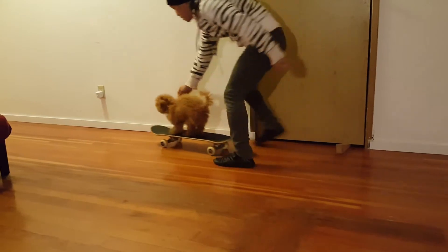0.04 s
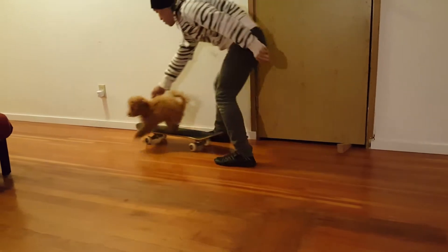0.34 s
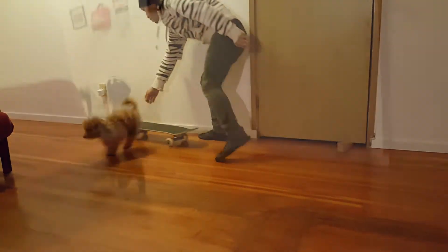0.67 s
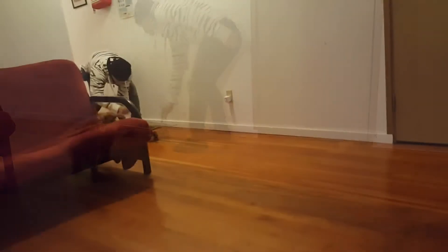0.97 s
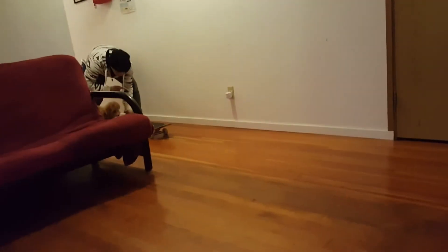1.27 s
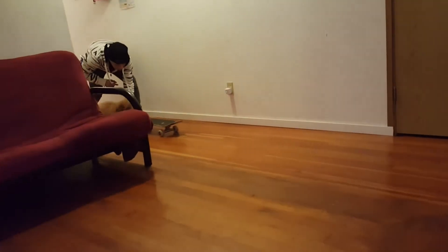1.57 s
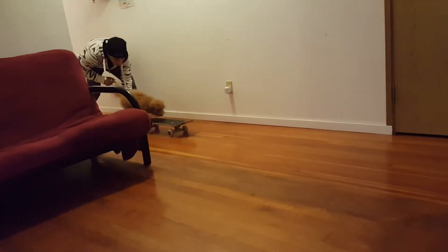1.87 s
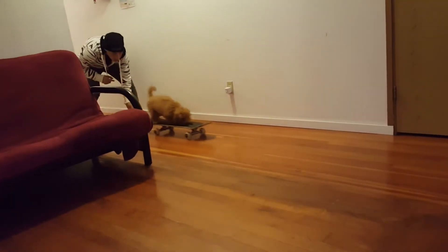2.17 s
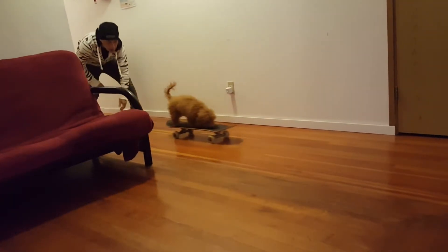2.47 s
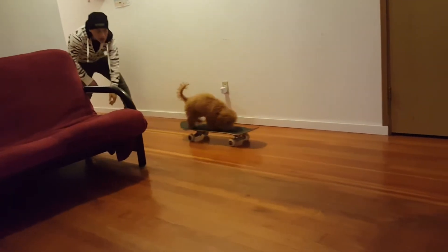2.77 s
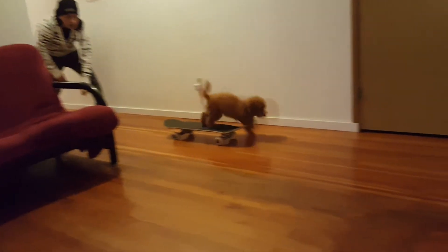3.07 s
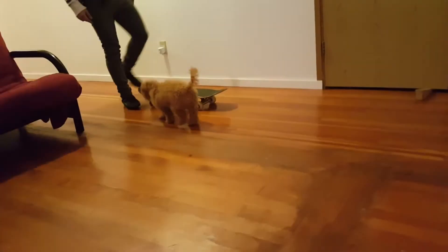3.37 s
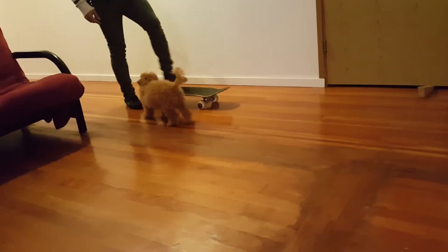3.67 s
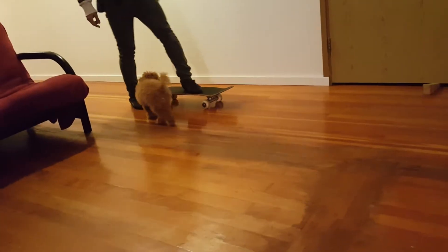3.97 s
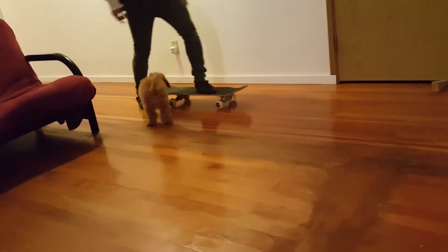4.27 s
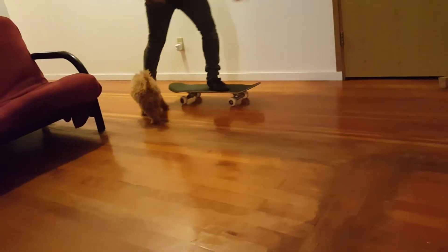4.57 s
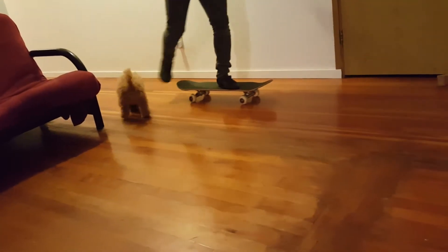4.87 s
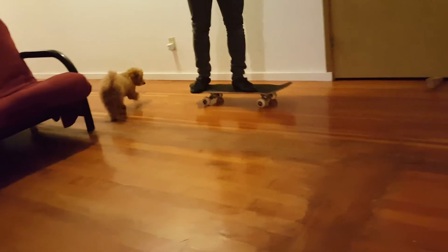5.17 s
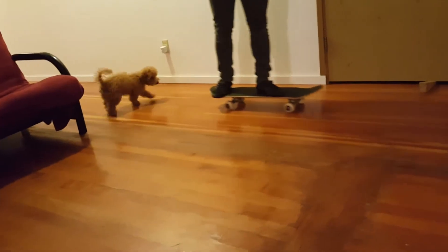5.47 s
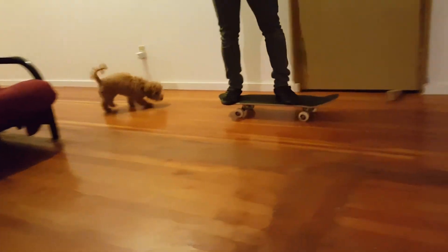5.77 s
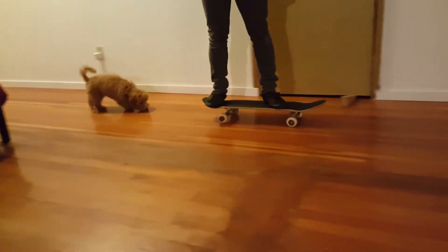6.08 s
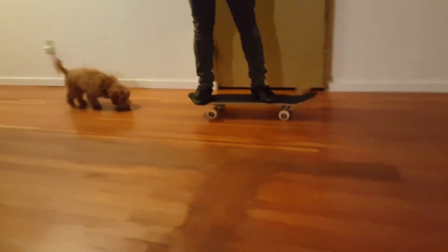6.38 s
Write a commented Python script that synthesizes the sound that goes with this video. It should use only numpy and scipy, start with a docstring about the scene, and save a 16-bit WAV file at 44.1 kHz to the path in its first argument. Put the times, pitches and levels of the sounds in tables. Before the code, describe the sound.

In a bare living room, a skateboard is pushed across a hardwood floor, wheels rumbling while the deck knocks and the metal trucks rattle. It rolls again with small clacks and several louder clunks, stops, is stamped on, then rolls off with a heavier rumble. Shoes and paws scuff the grip tape, with a few light ticks. In the second half a finger softly bumps the microphone on the duller right side.

```python
"""A bare living room with a hardwood floor: a skateboard is pushed about, with a puppy on it, then a rider.
The wheels rumble over the boards; the deck knocks, its trucks rattle and the floor booms.
Shoes and paws scuff on the grip tape; light ticks come from claws, fittings and one click of a finger.
That finger lies over the right microphone port: it dulls that side and now and then bumps and rubs it."""
import sys
import numpy as np
from scipy import signal
from scipy.fft import rfft, irfft
from scipy.io import wavfile

SR = 44100
rng = np.random.default_rng(int(sys.argv[2]) if len(sys.argv) > 2 else 0)


def wrap_up_sound(samples):
    """Save the sound to the file named by the first command line argument, as 16-bit audio."""
    columns = np.atleast_2d(samples).T
    # keep every value between -1 and 1, then stretch to whole-number steps
    tamed = np.clip(columns, -1, 1)
    steps = np.round(tamed * 32767).astype(np.int16)
    wavfile.write(sys.argv[1], SR, steps)


N = 288414
RING_SIZE = 32000   # samples for one hit and its tail

# resonances of the floor, the wooden deck and the metal trucks: f/Hz, width/Hz, level/dB
FLOOR_MODES = [(79.24, 3.6, -4.5), (113.5, 8, 1.5), (137.4, 11, -4), (167.8, 17.7, -4), (208.6, 16.5, -5),
               (233.4, 9.9, -6), (305.4, 28, -12.5)]
DECK_MODES = [(326, 17.2, 1), (347.5, 23.6, 7), (420, 172, 1.5), (622, 160, 4.5), (782, 86, 6.5),
              (956, 160, 2), (1079, 73, 4.5), (1250, 97, 1.5), (1502, 169, 1.5), (1875, 238, -1),
              (2153, 60, -0.5), (2310, 170, -6), (3085, 460, -13.5), (3420, 15.5, -8)]
TRUCK_MODES = [(3430, 1700, 1.5), (5240, 175, 14), (5236, 190, 13.5), (7200, 810, -1.5), (7890, 500, -4.5),
               (10440, 1700, -8), (15000, 11000, -12)]
# weight on the board, from a puppy to a rider: t/s, load/0-1
BOARD_LOAD = [(0, 0.23), (.9, 0.51), (1.2, 0.13), (2.6, 0.35), (3.2, 0.067), (4.9, 0.99), (6.54, 0.86)]


def from_db(db):
    """Decibels to gain."""
    return 10 ** (np.asarray(db) / 20)


def rms_one(x):
    """Scale to an rms of 1."""
    return x / np.sqrt(np.mean(x ** 2) + 1e-20)


def burst(x, db):
    """Give a short sound the energy of 50 ms at this level."""
    return from_db(db) * rms_one(x) * np.sqrt(SR / 20 / x.shape[-1])


def in_time(points):
    """Draw an automation curve through the points, sample by sample."""
    times, values = np.transpose(points)
    return np.interp(np.arange(N) / SR, times, values)


def at_hz(points, hz):
    """Read a curve on a log-frequency axis."""
    known, values = np.transpose(points)
    return np.interp(np.log(hz + 1), np.log(known), values)


def swell(s, half_s):
    """A smooth rise and fall around time s, of height 1."""
    return np.exp(-((np.arange(N) / SR - s) / half_s) ** 2)


def add(out, s, x):
    """Mix x into out from time s on."""
    start = max(round(s * SR), 0)
    out[..., start:start + x.shape[-1]] += x[..., :N - start]


def cut(x, hz, kind, order=2):
    """Butterworth low-pass or high-pass."""
    return signal.sosfilt(signal.butter(order, hz, kind, fs=SR, output="sos"), x)


def body(x, modes, tilt_db=0):
    """Parallel resonances of alternating sign, tilted per octave about 1 kHz."""
    out = 0
    for k, (hz, width, db) in enumerate(modes):
        r = np.exp(-np.pi * width / SR)
        gain = (-1) ** k * from_db(db + tilt_db * np.log2(hz / 1000)) * (1 - r * r) / 2
        poles = [1, -2 * r * np.cos(2 * np.pi * hz / SR), r * r]
        out = out + gain * signal.lfilter([1, 0, -1], poles, x)
    return out


def favour(modes, hz, db, octaves):
    """The spot struck brings out the modes near one pitch."""
    return [(f, width, level + db * np.exp(-(np.log2(f / hz) / octaves) ** 2))
            for f, width, level in modes]


def grains(size, per_s, spread_db):
    """Tiny contacts at random moments, of uneven strength."""
    hit = rng.random(size) < per_s / SR
    return (hit + 1e-9) * rng.standard_normal(size) * from_db(spread_db * rng.standard_normal(size))


def diffuse(size, spectrum=((1, 0),)):
    """Noise arriving from all sides: alike at both ports in the bass, unrelated in the treble."""
    # likeness of the room sound left and right: f/Hz, correlation/0-1
    likeness = [(60, 0.84), (130, 1), (250, 0.92), (500, 0.66), (1000, 0.0021), (2000, 0), (4000, 0)]
    hz = np.fft.rfftfreq(size, 1 / SR)
    alike = at_hz(likeness, hz)
    mid, side = rfft(rng.standard_normal((2, size)))
    pair = np.sqrt(1 + alike) * mid + np.sqrt(1 - alike) * side * [[1], [-1]]
    return rms_one(irfft(pair * from_db(at_hz(spectrum, hz)), size))


def room(contacts, t60, direct_db, build_s=0.0012):
    """Each contact arrives directly, then feeds a diffuse tail that builds up and dies away."""
    decay, build = from_db(-120 / (t60 * SR)), np.exp(-1 / (build_s * SR))
    energy = signal.lfilter([(1 - decay) * (1 - build)], np.poly([decay, build]), contacts ** 2)
    direct = np.array([contacts, np.pad(contacts, (3, 0))[:-3]])   # left leads by 3 samples
    return from_db(direct_db) * direct + diffuse(len(contacts)) * np.sqrt(np.abs(energy))


def room_tone():
    """The quiet room and the microphone's hiss make a steady bed."""
    # colour of the bed: f/Hz, relative level/dB
    spectrum = [(20, -18.5), (50, 2.5), (130, -6.5), (300, -4), (700, -12.5), (2300, -14.5), (4000, -23),
                (9000, -33.5), (15500, -30)]
    return from_db(-62.5) * diffuse(N, spectrum)


def finger(loose_hz=163.5, tight_hz=232, tightens_s=5.25, lead_s=0.015):
    """Skin pushes and releases the air in the port: soft swings of a cycle or two, and a low rub."""
    # bumps on the port: t/s, peak level/dB
    bumps = [(3.712, -36.5), (3.756, -33.5), (3.804, -37), (3.881, -34.5), (3.899, -33.5), (3.954, -40),
             (4.081, -37.5), (4.591, -29.5), (4.629, -27.5), (4.6552, -27.5), (4.7684, -18), (4.935, -19.5),
             (5.018, -26), (5.052, -28), (5.147, -26), (5.352, -20.5), (5.597, -19.5), (5.765, -21),
             (5.807, -19.5), (6.307, -26.5), (6.338, -25)]
    # rubs across it: t/s, level/dB, half length/s
    rubs = [(3.395, -43, 0.023), (3.424, -41.5, 0.0072), (3.514, -49, 0.053)]
    out, t = np.zeros(N), np.arange(SR // 20) / SR
    for s, db in bumps:
        grip_hz = loose_hz if s < tightens_s else tight_hz
        hz = grip_hz * 2 ** (0.07 * (db + 28))   # a harder bump is quicker
        phase = 2 * np.pi * hz * (t - lead_s)
        swing = cut(np.sin(phase) / np.cosh(phase / 1.21), 33, "high")
        add(out, s - lead_s, from_db(db) * swing / np.abs(swing).max())
    slips = grains(N, per_s=1200, spread_db=1)
    rub = cut(body(slips, [(495, 180, 0)]), 1200, "low")
    strokes = sum(from_db(db) * swell(s, half_s) for s, db, half_s in rubs)
    return out + strokes * rms_one(rub)


def ticks():
    """Light ticks, each a damped ring: claws, fittings and one click of the finger on the microphone."""
    # light touches: t/s, level/dB, f/Hz
    touches = [(3.421, -61.5, 2450), (3.992, -65.5, 5260), (4.782, -69.5, 1190), (4.95, -61.5, 1110),
               (5.012, -64, 1600), (6.523, -65, 5250)]
    out = np.zeros((2, N))
    for s, db, hz in touches:
        touch = room(signal.unit_impulse(RING_SIZE), t60=0.98, direct_db=-2.5)
        add(out, s, burst(body(touch, [(hz, 0.28 * hz, 0)]), db))
    return out


def scuffs():
    """A sole or paw slides over grit: dense catches, a broad hiss with one rasping resonance."""
    # slides on grip tape and floor: t/s, length/s, level/dB, rasp f/Hz, relative rasp level/dB
    slides = [(0.85, 0.12, -54, 4400, -8.5), (1.369, 0.059, -57.5, 1460, 11),
              (2.037, 0.036, -62.5, 6500, 11), (2.27, 0.035, -62.5, 6000, 8), (2.5, 0.1, -59, 7000, 10),
              (2.69, 0.06, -58, 7000, 10), (3.702, 0.084, -66, 2130, 0), (4.692, 0.06, -68, 1530, 8),
              (5.847, 0.13, -45, 2440, -4.5), (5.9, 0.048, -44.5, 1900, 35), (6.163, 0.12, -46.5, 5200, 4),
              (6.196, 0.14, -49, 3100, -2.5)]
    # resonances of the grip tape: f/Hz, width/Hz, level/dB
    grip_tape = [(1620, 490, -0.5), (2750, 2300, -14.5), (5360, 5900, -15), (7080, 290, -7.5),
                 (12000, 2600, -64)]
    out, t = np.zeros((2, N)), np.arange(RING_SIZE) / SR
    for s, length_s, db, rasp_hz, rasp_db in slides:
        stroke = np.clip(t / 0.0019, 0, 1) * np.clip((length_s - t) / 0.12, 1e-9, 1)
        sand = grains(RING_SIZE, per_s=1500, spread_db=2)
        catches = room(sand * stroke, t60=0.62, direct_db=-1.5)
        add(out, s, burst(body(catches, grip_tape + [(rasp_hz, 0.19 * rasp_hz, rasp_db)]), db))
    return out


def boom(floor_hz):
    """A heavy blow sets the floorboards ringing."""
    blow = room(signal.unit_impulse(RING_SIZE), t60=0.37, direct_db=0.0, build_s=0.003)
    boards = body(blow, favour(FLOOR_MODES, floor_hz, db=12.0, octaves=0.25))
    return cut(cut(boards, 60, "high", order=4), 1300, "low")


def rattle(decay_s, rebound=0.091):
    """One blow, then fading rebounds; the longer they last, the more of the energy they hold."""
    t = np.arange(RING_SIZE) / SR
    rebounds = grains(RING_SIZE, per_s=700, spread_db=4.5) * (np.exp(-t / decay_s) + 1e-9)
    strength = rebound * np.sqrt(decay_s * SR)
    return signal.unit_impulse(RING_SIZE) + strength * rebounds / np.linalg.norm(rebounds)


def knock(deck_db, boom_db, tilt_db, rattle_s, floor_hz, deck_hz, hardness_hz):
    """A rattling blow shakes the deck and the metal trucks; the weight behind it booms in the floor."""
    contacts = rattle(rattle_s)
    deck_modes = favour(DECK_MODES, deck_hz, db=4.5, octaves=0.27)
    wood = body(room(contacts, t60=0.54, direct_db=-6.0), deck_modes, tilt_db)
    wood = cut(cut(wood, 4300, "low", order=4), 164, "high")
    metal = cut(body(room(contacts, t60=0.54, direct_db=-2.5), TRUCK_MODES), 4940, "high")
    metal = cut(burst(metal, deck_db - 14), hardness_hz, "low", order=3)
    lag = round(0.00607 * SR)   # the heavy floor answers a moment later
    floor = np.pad(boom(floor_hz), ((0, 0), (lag, 0)))[:, :RING_SIZE]
    return burst(wood, deck_db) + burst(floor, boom_db) + metal


def board_hits(empty_hz=261, loaded_hz=76.5):
    """The board hits the floor: heavy slams, light clacks and dull thuds of the floor alone."""
    # the board slams down or is stamped on: t/s, deck level/dB, boom level/dB,
    # deck tilt/dB per octave, rattle decay/s, floor f/Hz, deck f/Hz, contact hardness/Hz
    slams = [(0.1885, -32, -28.5, -4, 0.0034, 107, 1950, 11500),
             (0.194, -35, -34.5, 8.5, 0.0097, 230, 1100, 11900),
             (0.504, -31, -34.5, 2.5, 0.017, 115, 776, 14800),
             (0.595, -31, -28, 0.5, 0.014, 123.5, 844, 12900),
             (1.8196, -30.5, -33.5, 0.5, 0.011, 93.6, 1260, 9800),
             (2.8784, -30, -29, 1, 0.0057, 80, 2220, 14500),
             (2.899, -32, -34.5, 1, 0.0036, 142, 1050, 5060), (3.082, -30, -37, 2.5, 0.014, 85, 2220, 8000),
             (3.202, -31.5, -33.5, -0.5, 0.024, 94, 2340, 10500),
             (4.104, -30.5, -34.5, 0, 0.0018, 168, 1900, 14000),
             (4.11, -27.5, -35, 2, 0.041, 90, 1254, 7000),
             (4.131, -32.5, -30.5, -0.5, 0.011, 133, 700, 10300),
             (5.169, -32.5, -40, 3, 0.0088, 119, 1220, 4970)]
    # a wheel drops into a seam or the board rocks:
    # t/s, deck level/dB, deck tilt/dB per octave, rattle decay/s
    clacks = [(0.0473, -45, 9, 0.0008), (0.409, -47, -0.5, 0.0031), (0.778, -44, 0.5, 0.0022),
              (1.331, -48.5, 0.5, 0.014), (1.555, -42, 3.5, 0.013), (2.288, -40, -1.5, 0.017),
              (2.495, -39, 1.5, 0.027), (2.574, -43, 0, 0.0047), (2.682, -41, 2.5, 0.046),
              (2.805, -42, 1.5, 0.052), (4.215, -45.5, 1, 0.004), (5.897, -41, 4, 0.018)]
    # the floor thuds under a shift of weight: t/s, level/dB, f/Hz
    thuds = [(0.001, -44, 154), (0.351, -38.5, 125), (4.945, -44.5, 155), (5.249, -40.5, 112),
             (5.737, -42, 119)]
    out, load = np.zeros((2, N)), in_time(BOARD_LOAD)
    for s, *blow in slams:
        add(out, s, knock(*blow))
    for s, db, tilt_db, rattle_s in clacks:
        floor_hz = empty_hz * (loaded_hz / empty_hz) ** load[round(s * SR)]   # weight lowers the thud
        # a brighter clack is a harder contact with less weight behind it
        hardness_hz = 10000 * 2 ** (0.072 * tilt_db)
        boom_db = db - 2.5 - 0.95 * tilt_db
        add(out, s, knock(db, boom_db, tilt_db, rattle_s, floor_hz, deck_hz=750, hardness_hz=hardness_hz))
    for s, db, hz in thuds:
        add(out, s, burst(boom(hz), db))
    return out * from_db(-11 * swell(3.448, half_s=0.13))   # the level dips briefly


def wheels(cruise_db=-46):
    """The wheels run over the grain of the wood; countless small jolts drive floor, deck and bearings."""
    # speed as rolling level, in three runs (pushed off, carrying the puppy, ridden): t/s, level/dB
    runs = [
        [(0.0, -41), (0.248, -50), (0.364, -42.5), (0.47, -40.5), (0.656, -33), (0.726, -43.5), (0.89, -47),
         (1.002, -52.5), (1.15, -55.5)],
        [(1.16, -58), (1.26, -52), (1.56, -47), (2.42, -43), (2.49, -41.5), (2.92, -45), (3.12, -41),
         (3.43, -60), (3.5, -60.5)],
        [(4.7, -60), (4.95, -52), (5.14, -45.5), (5.53, -42.5), (5.796, -39), (5.98, -46), (6.282, -46),
         (6.426, -46.5), (6.54, -44.5)],
    ]
    # riding over high spots of the floor: t/s, boost/dB, half length/s
    high_spots = [(2.059, 5.5, 0.038), (2.305, 6, 0.054), (2.573, 3, 0.07), (2.73, 7, 0.051),
                  (2.833, 0.5, 0.03)]
    speed_db = in_time(np.vstack(runs)) + sum(db * swell(s, half_s) for s, db, half_s in high_spots)
    load = in_time(BOARD_LOAD)

    def fader(trim_db, speed_slope, load_db):
        """Speed and weight ride the level of one layer."""
        return from_db(cruise_db + trim_db + speed_slope * (speed_db - cruise_db) + load_db * load)

    jolts = room(grains(N, per_s=800, spread_db=2.5), t60=0.43, direct_db=-4.5)
    # a light board bounces on its wheels; a heavy one presses the jolts into the floorboards
    bounce = body(jolts, [(144, 92, -2.3), (231, 87, 1)])
    bounce = cut(cut(bounce, 61, "high"), 760, "low")
    boards = body(jolts, favour(FLOOR_MODES, hz=129.6, db=2.5, octaves=1.0), tilt_db=-5.0)
    boards = cut(cut(boards, 106.3, "high", order=4), 460, "low")
    rumble = np.sqrt(1 - load) * rms_one(bounce) + np.sqrt(load) * rms_one(boards)
    deck = body(jolts, DECK_MODES, tilt_db=-4.0)
    growl = rms_one(cut(cut(deck, 676, "low", order=3), 430, "high"))
    grit = rms_one(cut(cut(deck, 826, "high", order=3), 3600, "low"))
    bearings = from_db(-14) * rms_one(body(jolts, TRUCK_MODES))
    return (fader(-3.5, speed_slope=1, load_db=0.87) * rumble
            + fader(-7.0, speed_slope=1.11, load_db=0.49) * growl
            + fader(-6.5, speed_slope=1.235, load_db=-7.5) * (grit + bearings))


def scene():
    """The board in the room, panned a touch right; the finger's bumps and rubs on the right only."""
    board = (board_hits() + wheels() + scuffs() + ticks()) * from_db([[-.7], [.7]])
    return board + finger() * np.array([[0], [1]])


def record(dry, covered_hz=3400, leak_db=-14, cutoff_hz=15900):
    """The covered right port passes little treble; room tone lies under everything; the top is cut."""
    left, right = dry
    hz = np.fft.rfftfreq(N, 1 / SR)
    # muffling by the finger: f/Hz, gain/dB
    cover = [(covered_hz * 0.95, 0), (covered_hz * 1.46, leak_db), (8000, -15), (12000, -10), (15000, -7)]
    right = irfft(rfft(right) * from_db(at_hz(cover, hz)), N)
    heard = np.array([left, right]) + room_tone()
    return signal.sosfilt(signal.ellip(10, .1, 80, cutoff_hz, fs=SR, output="sos"), heard)


dry = scene()
out = record(dry)
wrap_up_sound(out)
```